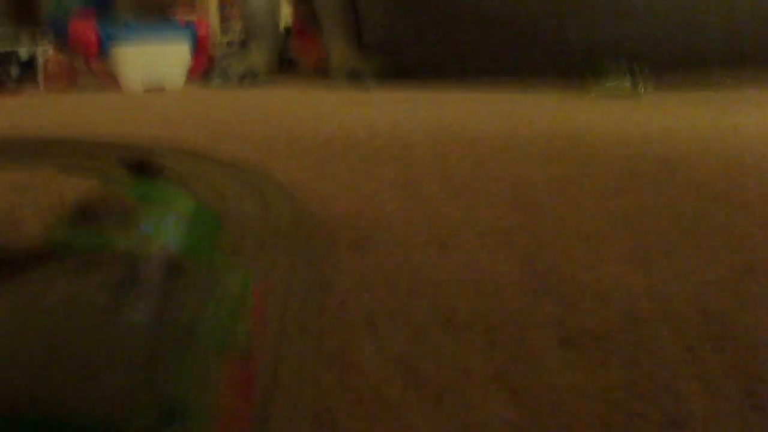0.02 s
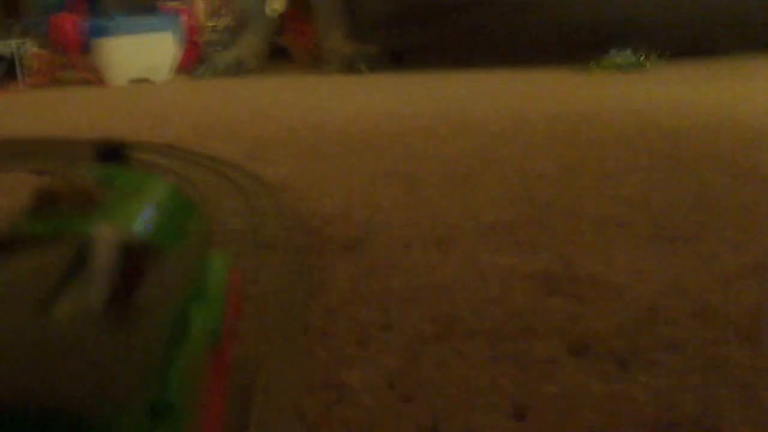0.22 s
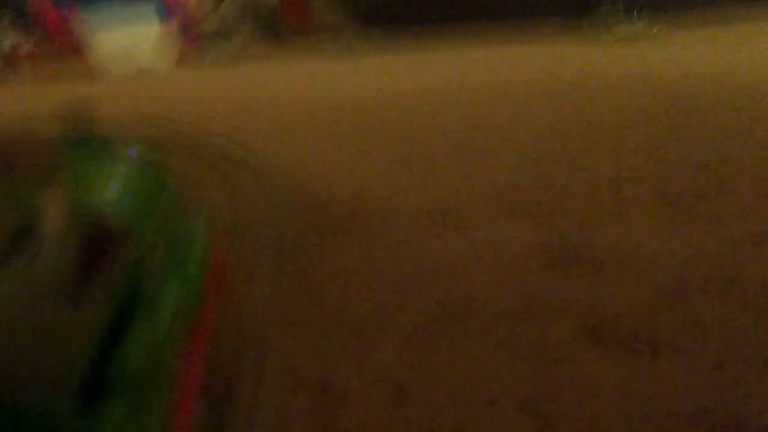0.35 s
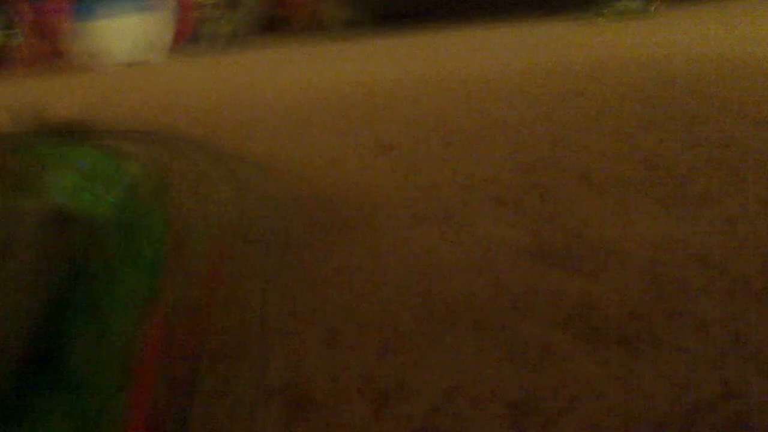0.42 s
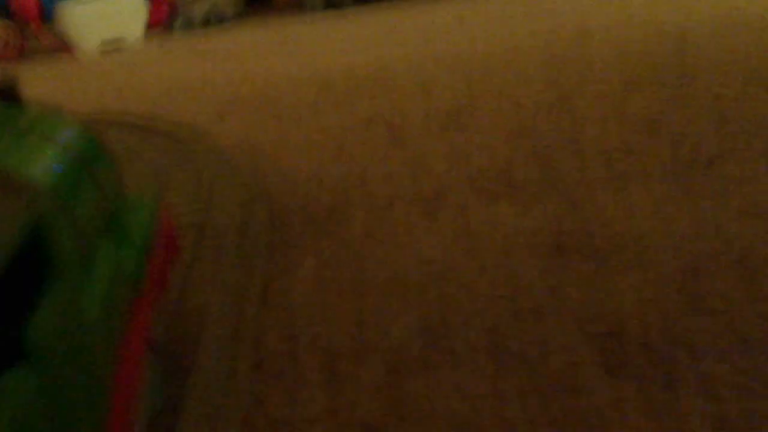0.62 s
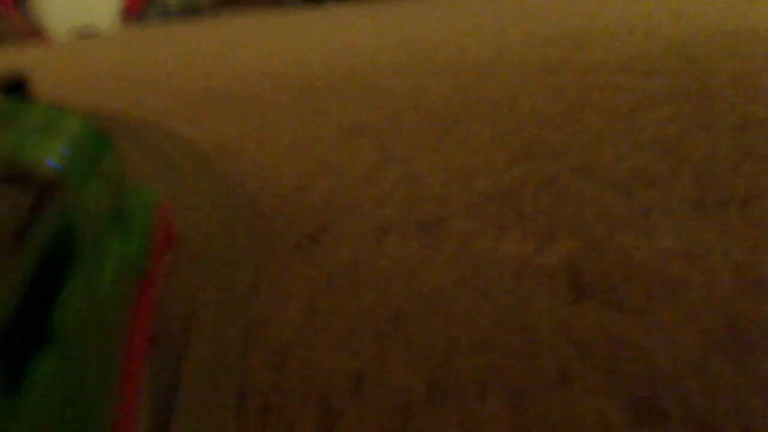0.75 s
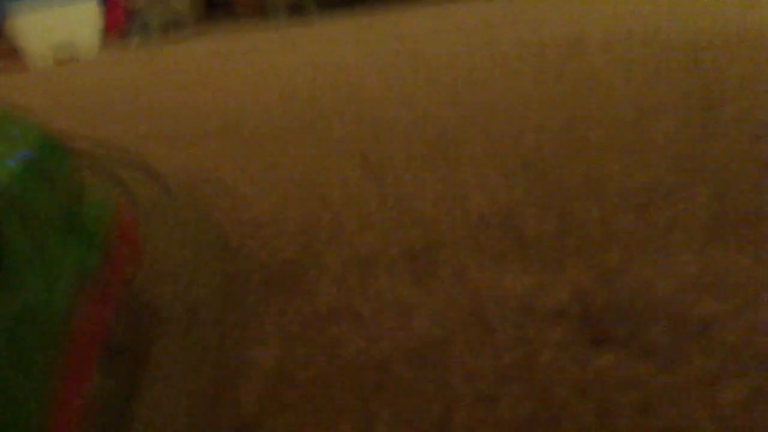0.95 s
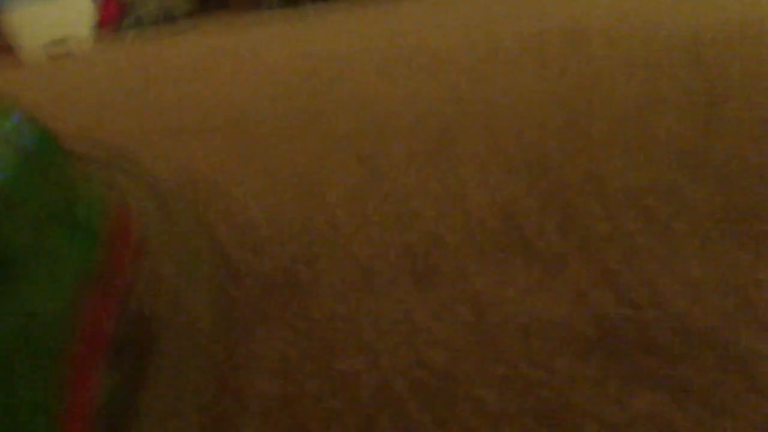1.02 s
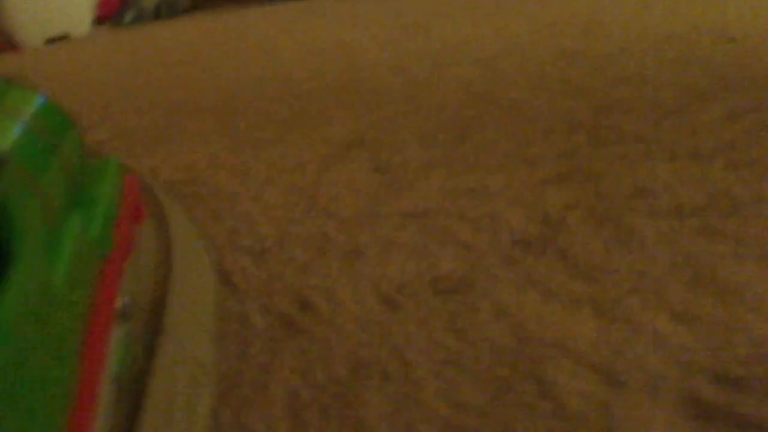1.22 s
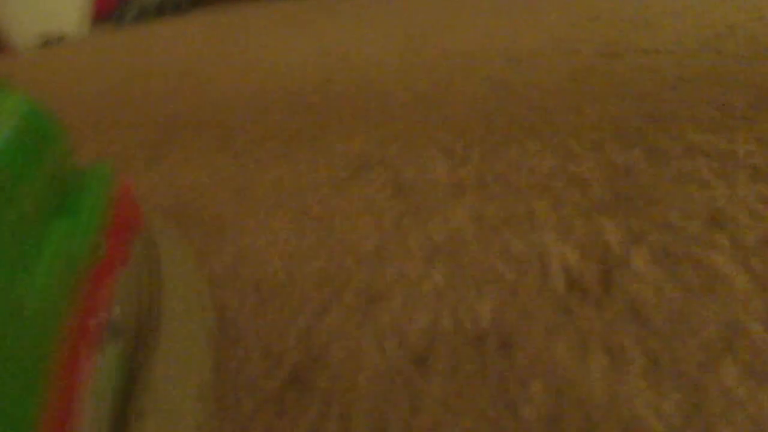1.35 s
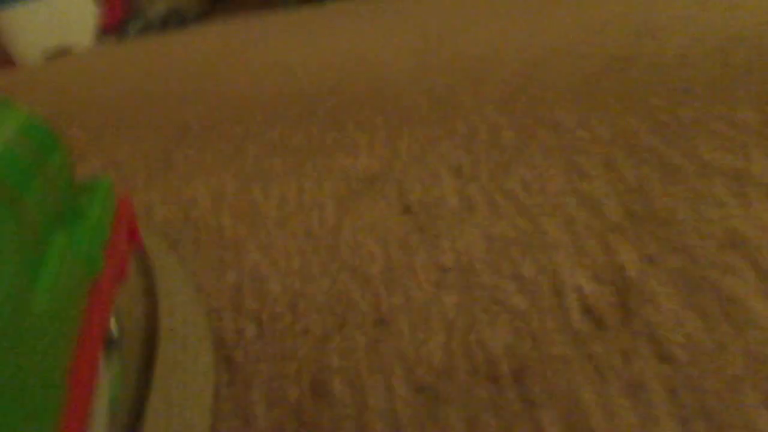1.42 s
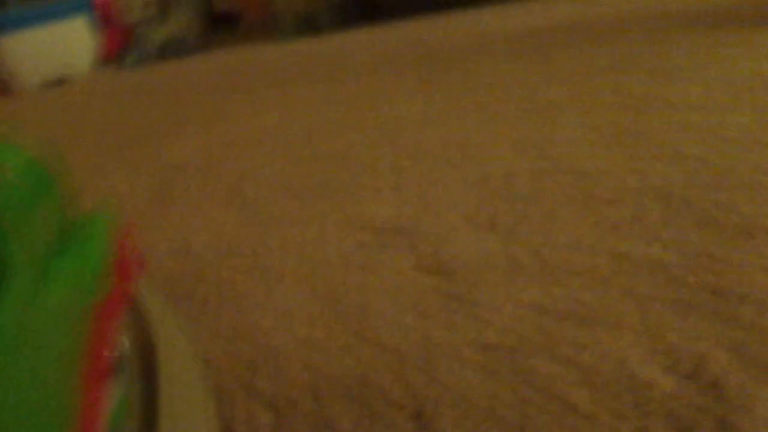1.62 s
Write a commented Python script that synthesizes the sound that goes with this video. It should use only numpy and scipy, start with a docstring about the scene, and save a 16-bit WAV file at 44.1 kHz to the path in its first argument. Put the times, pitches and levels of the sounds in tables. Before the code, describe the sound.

A battery toy train runs on plastic track over carpet, heard very close, its motor and gears whirring throughout. A sharp plastic snap comes right at the start, with faint axle squeaks. From about 0.1 seconds the wheels knock and rattle the hollow body quickly and unevenly, with dull thumps and small clicks. The strongest knock falls near 0.7 seconds between two brief axle groans. Rattling continues until about 1.7 seconds.

```python
"""Battery toy train on plastic track over carpet, microphone riding on it.
Motor and gears whir throughout; rubbing axles briefly squeak and groan.
A hard plastic snap comes near the start. Then the wheels knock and rattle the hollow body,
the track thumps on the carpet and loose parts click. A faint low drone lies underneath."""
import sys
import numpy as np
from scipy import signal
from scipy.fft import rfft, irfft, next_fast_len
from scipy.io import wavfile
from scipy.ndimage import map_coordinates

SR = 44100
rng = np.random.default_rng(int(sys.argv[2]) if len(sys.argv) > 2 else 0)


def master(y):
    """Save y as 16-bit WAV."""
    cut = np.clip(np.atleast_2d(y).T, -1, 1)
    pcm = np.round(cut * 32767)  # scale
    wavfile.write(sys.argv[1], SR, pcm.astype(np.int16))


N = 74970
T = np.arange(N) / SR
EVENT_T = T[:SR // 10]


def amp(db):
    return 10 ** (np.asarray(db) / 20)


def unit_rms(x):
    return x / np.sqrt(np.mean(x ** 2) + 1e-20)


def curve(rows):
    """One value per sample from (time_s, value) rows."""
    return np.interp(T, *np.transpose(rows))


def wobble(knots_per_s):
    """Smooth random curve."""
    return map_coordinates(rng.standard_normal(int(N * knots_per_s / SR) + 4), [T * knots_per_s])


def filtered(x, response):
    """FFT filter with gain response(hz)."""
    size = next_fast_len(len(x) + 8192)
    return irfft(rfft(x, size) * response(np.fft.rfftfreq(size, 1 / SR)), size)[:len(x)]


def coloured(x, colour):
    """x shaped by (freq_hz, gain_db) rows, at rms 1."""
    freq_hz, gain_db = np.transpose(colour)
    return unit_rms(filtered(x, lambda hz: amp(np.interp(np.log(hz + 1), np.log(freq_hz + 1), gain_db))))


def noise(colour, samples=N):
    return coloured(rng.standard_normal(samples), colour)


def resonance(hz, centre_hz, half_width_hz):
    return 1 / (1 + ((hz - centre_hz) / half_width_hz) ** 2)


def add(track, start_s, sound):
    part = track[max(round(start_s * SR), 0):][:len(sound)]
    part += sound[:len(part)]


def swell(rise_s):
    """Reaches 1 at rise_s, then decays."""
    return EVENT_T / rise_s * np.exp(1 - EVENT_T / rise_s)


def decay(t60_s):
    return np.exp(-np.log(1000) * EVENT_T / t60_s)


def ping(pitch_hz, rise_s, phase_cycles=0):
    """One damped mode."""
    return swell(rise_s) * np.sin(2 * np.pi * (pitch_hz * EVENT_T + phase_cycles))


def ring(modes, pitch_hz, scatter_db=2.5, detune=0.025):
    """One blow on damped modes, each scattered in level and pitch."""
    out = np.zeros(len(EVENT_T))
    for ratio, level_db, rise_s in modes:
        gain = amp(level_db + scatter_db * rng.standard_normal())
        mode_hz = pitch_hz * ratio * (1 + detune * rng.standard_normal())
        out += gain * ping(mode_hz, rise_s)
    return out


def bursts(rate_hz, jitter, scatter_db, t60_s):
    """Train of tiny noise bursts, uneven in size and spacing."""
    timing, size = rng.standard_normal((1024, 2)).T
    onsets = np.round((np.arange(len(timing)) + jitter * timing) / rate_hz * SR).astype(int)
    inside = (onsets >= 0) & (onsets < N)
    hits = np.bincount(onsets[inside], amp(scatter_db * np.clip(size[inside], -2, 2)), N)
    return signal.fftconvolve(hits, decay(t60_s))[:N] * rng.standard_normal(N)


def drone(level_db=-60):
    """Faint, steady low noise."""
    colour = [(25, -16), (80, 14), (250, -29), (400, 13), (550, -16.5), (900, 1), (1500, -43),
              (4000, -26.5)]  # drone spectrum: freq_hz, gain_db
    return amp(level_db) * noise(colour)


def motor(shaft_hz=117.5, pulse_depth=0.24, whir_db=-1.52, gear_db=-11.5, whine_db=-11.5):
    """Whir pulsing with the shaft, gear teeth ticking in uneven clumps, and a thin whine."""
    envelope = [(0, -43.5), (.1, -48.5), (.2, -47.5), (.35, -46.5), (.55, -45), (.75, -47), (.95, -47),
                (1.2, -45.5), (1.45, -47), (1.7, -45.5)]  # overall motor gain: time_s, gain_db
    whir_colour = [(600, -13), (1000, -4), (1180, -31), (1350, 1), (1600, -6), (1950, 3), (2450, 0.5),
                   (2640, 4.5), (2750, 1.5), (2890, 7), (3060, -0.5), (3230, 3.5), (3600, -2.5),
                   (4350, 0.5), (4720, -9), (5450, -1.5), (6100, -3.5), (6500, -10.5), (7000, -8.5),
                   (7800, -21.5), (9000, -14), (10800, -17.5), (11300, -15.5), (13000, -25), (15000, -37),
                   (16000, -45)]  # whir spectrum: freq_hz, gain_db
    gear_colour = [(1000, 6.5), (3000, -5.5), (4700, 2), (5600, -1.5), (7500, -1.5), (9000, 5),
                   (10100, 0.5), (10800, -11.5), (13500, -8), (15000, -24), (16000, -37)]  # tooth tick spectrum: freq_hz, gain_db
    turns = np.cumsum(shaft_hz * (1 + 0.027 * wobble(12))) / SR
    whir = noise(whir_colour) * (1 + pulse_depth * np.sin(2 * np.pi * turns))
    gears = coloured(bursts(rate_hz=440, jitter=0.25, scatter_db=3.5, t60_s=0.005), gear_colour)
    whine = filtered(rng.standard_normal(N), lambda hz: resonance(hz, centre_hz=3220, half_width_hz=63))
    whir *= amp(whir_db + 2.5 * wobble(90))
    gears *= amp(gear_db + 5 * wobble(140))
    return amp(curve(envelope)) * (whir + gears + amp(whine_db) * unit_rms(whine))


def axles(jitter=0.019, flutter_db=3.5, knots_per_s=260):
    """Rubbing axles: each stroke an unsteady gliding tone that swells and fades."""
    # high and low strokes: start_s, length_s, level_db, start_hz, end_hz
    squeaks = [(.002, 0.048, -43, 3250, 3150), (0.127, 0.053, -38.5, 3170, 3280),
               (.21, 0.047, -49, 3300, 3126)]
    groans = [(0, 0.015, -41, 395, 374), (0.617, 0.038, -34, 480, 331), (0.745, 0.051, -35, 329, 486)]
    out = np.zeros(N)
    for start_s, length_s, level_db, start_hz, end_hz in squeaks + groans:
        progress = np.clip((T - start_s) / length_s, 0, 1)
        pitch_hz = (start_hz + (end_hz - start_hz) * progress) * (1 + jitter * wobble(knots_per_s))
        envelope = amp(level_db + flutter_db * wobble(knots_per_s)) * np.sin(np.pi * progress)
        out += envelope * np.sin(2 * np.pi * np.cumsum(pitch_hz) / SR)
    return out


def rattle(gain_db=-2):
    """Loose parts rattling between the wheel knocks."""
    envelope = [(0, -39.5), (.06, -56), (.11, -89), (.14, -36.5), (.25, -40.5), (.28, -51), (.34, -37),
                (.42, -38.5), (.47, -38), (.56, -37.5), (.605, -50), (.66, -41.5), (.75, -40), (.82, -44),
                (.93, -39), (1.15, -41.5), (1.2, -50.5), (1.32, -37.5), (1.47, -57.5), (1.54, -39.5),
                (1.59, -56), (1.65, -41), (1.7, -51)]  # rattle strength: time_s, level_db
    colour = [(30, -35), (80, -19), (160, -5.5), (280, 3.5), (410, 3.5), (500, -1.5), (600, -0.5),
              (750, -4), (810, 9.5), (885, 5.5), (1060, -6.5), (1180, -11), (1370, -9), (2000, -19.5),
              (4000, -50)]  # rattle spectrum: freq_hz, gain_db
    impacts = bursts(rate_hz=320, jitter=1, scatter_db=5.5, t60_s=0.017)
    return amp(curve(envelope) + gain_db) * coloured(impacts, colour)


def hollow_body(hz):
    """Complex response of the hollow plastic body."""
    # resonances and the gaps between them: centre_hz, width_hz, gain_db
    peaks = [(412, 70, 2), (585, 50, 3), (757, 45, 4), (877, 35, 5), (1060, 60, 2)]
    dips = [(498, 162, -6), (828.5, 83, -19.5), (1165, 49, -51)]
    response = 1
    for centre_hz, width_hz, gain_db in peaks + dips:
        damping = 1j * hz * width_hz
        response *= 1 + (amp(gain_db) - 1) * damping / (centre_hz ** 2 - hz ** 2 + damping)
    return response


def snap(crack_db=-8, tail_db=-22):
    """Hard plastic snap: bright crack, short modes, faint duller tail."""
    hits = [(0.0534, 0.5, 0.87), (0.0692, -10.5, 0.28)]  # snap and rebound: start_s, level_db, stretch
    modes = [(2810, -45.5, 0.0081), (3930, -28, 0.001), (4360, -17.5, .0011), (5390, -15.5, 0.0015),
             (7470, -11.5, 0.0007), (8370, -6.5, 0.00092), (9630, -15, .0009), (10690, -8, .0007),
             (11150, -9, 0.00063)]  # plastic modes: pitch_hz, mode_db, rise_s
    crack_colour = [(150, -19), (1000, -16), (2300, -19), (2900, -18), (3800, 2.5), (6500, -3),
                    (9000, -2.5), (11000, 6), (12200, -1), (14200, 0), (15500, -16), (16500, -24)]  # crack spectrum: freq_hz, gain_db
    tail_colour = [(150, -32), (1000, -1.5), (2200, -19), (2900, -7), (4400, 8.5), (6000, 2), (7200, -12),
                   (8700, 4), (10000, 1), (11300, -5), (12500, -1), (15500, -9), (16500, -28)]  # tail spectrum: freq_hz, gain_db
    out = np.zeros(N)
    for start_s, level_db, stretch in hits:
        crack = amp(crack_db) * swell(rise_s=stretch * 0.0012) * noise(crack_colour, len(EVENT_T))
        tail = amp(tail_db) * decay(t60_s=0.061) * noise(tail_colour, len(EVENT_T))
        ringing = sum(amp(mode_db) * ping(pitch_hz, stretch * rise_s, rng.random())
                      for pitch_hz, mode_db, rise_s in modes)
        add(out, start_s, amp(level_db) * (crack + ringing + tail))
    return out


def wheel_knocks():
    """Each wheel knock rings shell and chassis."""
    knocks = [(.131, -32.5, 850, -35.5, 377), (.1455, -20, 908, -40, 510), (.1824, -27.5, 940, -41, 407),
              (0.2126, -42, 1040, -36, 395), (0.2257, -23.5, 944, -39, 457), (0.2461, -26, 975, -39.5, 444),
              (.2675, -29, 950, -59, 342), (0.3027, -24.5, 875, -41, 387), (0.3162, -27, 850, -34, 403),
              (.333, -26.5, 840, -41, 384), (.3419, -28.5, 830, -41, 380), (0.352, -31, 870, -27, 340),
              (.362, -17.5, 931, -34, 427), (.3795, -31, 806, -32, 474), (0.3893, -23, 940, -42, 307),
              (0.4242, -32, 736, -36, 420), (0.4533, -21, 940, -31.5, 380), (0.4579, -36, 946, -30.5, 385),
              (.462, -22.5, 1006, -51, 403), (0.4676, -26, 996, -32, 320), (0.487, -22.5, 953, -34.5, 312),
              (.517, -36, 980, -37.5, 370), (.535, -23, 954, -28.5, 365), (0.546, -24.5, 776, -31, 426),
              (0.5564, -28.5, 934, -47, 396), (.578, -26, 976, -38, 498), (0.582, -27.5, 950, -38, 462),
              (.627, -33.5, 1010, -30, 411), (0.6479, -26, 880, -37, 384), (.656, -24, 877, -38, 384),
              (.682, -12, 916, -31.5, 417), (.6893, -19, 862, -52, 466), (0.6994, -27, 880, -41, 526),
              (0.7206, -37, 680, -38, 570), (0.7496, -28, 913, -37.5, 318), (0.7844, -24.5, 940, -44, 430),
              (0.8002, -20, 903, -52, 514), (.809, -32.5, 786, -60, 557), (0.8376, -30.5, 870, -46, 280),
              (0.8775, -20.5, 857, -31, 337), (0.9124, -22, 890, -38, 415), (0.9249, -24, 863, -37, 371),
              (0.9344, -27.5, 915, -33, 374), (0.964, -27, 880, -33.5, 383), (0.9813, -32, 902, -43, 357),
              (1.027, -32.5, 814, -28, 394), (1.092, -34.5, 870, -30.5, 335),
              (1.1135, -22, 910, -32.5, 376), (1.1226, -28, 810, -54, 365), (1.1352, -34, 890, -32.5, 450),
              (1.1517, -24.5, 787, -40, 441), (1.161, -43, 830, -41, 402), (1.232, -33.5, 930, -38.5, 400),
              (1.2602, -23.5, 790, -36.5, 588), (1.292, -54, 940, -27, 343), (1.3142, -39, 900, -26.5, 384),
              (1.319, -30.5, 900, -50, 435), (1.326, -29, 884, -36.5, 417), (1.338, -33, 902, -36.5, 490),
              (1.398, -35, 670, -33.5, 404), (1.411, -44, 870, -40, 350), (1.521, -22.5, 965, -39, 460),
              (1.529, -34, 1000, -38, 429), (1.552, -34.5, 957, -54, 358), (1.612, -35.5, 970, -33.5, 271),
              (1.653, -34, 783, -44, 343)]  # wheel blows: start_s, shell_db, shell_hz, chassis_db, chassis_hz
    # struck modes: pitch_ratio, level_db, rise_s
    shell_modes = [(1, -2, 0.0015), (1.14, -21.5, 0.0065)]
    chassis_modes = [(1.049, 0.5, 0.0034), (1.52, -13, 0.0049), (0.714, -13.5, 0.0063)]
    out = np.zeros(N)
    for start_s, shell_db, shell_hz, chassis_db, chassis_hz in knocks:
        shell = amp(shell_db) * ring(shell_modes, shell_hz)
        chassis = amp(chassis_db) * ring(chassis_modes, chassis_hz)
        add(out, start_s, rng.choice([-1, 1]) * (shell + chassis))
    return out


def track_bumps():
    """Track thumping dully on the carpet."""
    bumps = [(0.1435, -44, 170, .002), (0.1817, -39, 197, 0.0021), (.2122, -38, 160, 0.0025),
             (.276, -41.5, 155, 0.0057), (0.3031, -27.5, 185, 0.0019), (0.3619, -28.5, 188, 0.0031),
             (0.379, -36.5, 130, 0.0022), (0.3891, -32, 234, 0.0013), (.538, -31.5, 266, 0.0033),
             (0.554, -40, 170, 0.0013), (.58, -35, 200, 0.0015), (0.6987, -36.5, 188, 0.0014),
             (0.7213, -35.5, 146, .0025), (.7492, -39, 128, 0.0029), (0.9807, -36.5, 240, 0.0013),
             (1.029, -28, 191, 0.0012), (1.091, -32, 173, 0.0024), (1.114, -48, 190, 0.0026),
             (1.159, -42, 130, 0.0012), (1.335, -35, 206, 0.001), (1.413, -32.5, 247, 0.0026),
             (1.551, -34.5, 217, 0.005), (1.654, -42, 170, 0.0023)]  # thumps: start_s, level_db, pitch_hz, rise_s
    out = np.zeros(N)
    for start_s, level_db, pitch_hz, rise_s in bumps:
        add(out, start_s, amp(level_db) * ping(pitch_hz, rise_s))
    return out


def clicks(scrape_db=-3, skirt_db=-31, half_width_ratio=0.23):
    """Loose plastic parts click and scrape: a short ring inside a broad noise band."""
    contacts = [(.1818, -35.5, 5270, 0.00058, -8), (0.1965, -21.5, 1840, 0.0008, -10),
                (0.196, -34.5, 4880, 0.0033, -15), (.203, -31, 2150, 0.0014, -3),
                (.2128, -30.5, 1590, 0.0025, 1), (.246, -38, 1890, 0.0021, -8),
                (.258, -36.5, 1910, 0.0035, 5.5), (0.304, -38, 5100, 0.00095, -9),
                (0.3612, -35.5, 1920, 0.0041, -4), (0.3794, -37, 7620, 0.0013, 1.5),
                (0.388, -38, 7400, 0.0026, -3), (.457, -37, 2050, 0.0078, -1),
                (0.4577, -32, 7230, 0.005, -11), (0.6887, -40.5, 6200, 0.004, -6),
                (0.7485, -39, 7000, 0.00079, -17), (.753, -49.5, 14000, 0.0064, -12),
                (.874, -40, 5950, 0.0031, -1), (0.9836, -40.5, 5150, 0.0023, -11),
                (1.0292, -26, 5370, 0.0011, 5), (1.028, -37.5, 1500, 0.0014, 1),
                (1.036, -41, 5600, 0.0042, 1), (1.047, -39, 5400, 0.0016, 1),
                (1.133, -37.5, 5020, 0.00079, 0), (1.15, -37.5, 4300, 0.0018, -14),
                (1.2507, -33.5, 5350, 0.0013, 6), (1.2578, -35, 4700, 0.0031, -13),
                (1.3135, -37, 5800, 0.00067, -7), (1.321, -42.5, 6030, .003, 4),
                (1.338, -40, 5000, 0.0023, -7), (1.397, -39, 5620, 0.00061, 1.5),
                (1.41, -37.5, 5740, 0.0027, -6), (1.648, -38.5, 1290, 0.0039, 3.5)]  # part contacts: start_s, level_db, centre_hz, rise_s, ring_db
    out = np.zeros(N)
    for start_s, level_db, centre_hz, rise_s, ring_db in contacts:
        def band(hz):
            skirt = amp(skirt_db) * resonance(hz, 0, 2 * centre_hz)
            return resonance(hz, centre_hz, half_width_ratio * centre_hz) + skirt
        hiss = unit_rms(filtered(rng.standard_normal(len(EVENT_T)), band))
        scrape = amp(scrape_db) * swell(rise_s) * hiss
        tick = amp(ring_db) * ping(centre_hz, rise_s=0.00086)
        add(out, start_s, amp(level_db) * (scrape + tick))
    return out


def scene(impact_db=-0.5):
    """Mono mix; knocks, bumps and rattle pass through the hollow body."""
    mix = drone() + snap()
    impacts = amp(impact_db) * (wheel_knocks() + track_bumps())
    mix += filtered(impacts + rattle(), hollow_body)
    return (mix + clicks() + axles() + motor())[None]


def record(dry, low_cut_hz=100, ceiling=1.17, top_hz=15900):
    """Bass cut, soft clip, band limit."""
    thinned = signal.sosfilt(signal.butter(2, low_cut_hz, "high", fs=SR, output="sos"), dry[0])
    rounded = thinned / (1 + (thinned / ceiling) ** 4) ** (1 / 4)
    return signal.sosfilt(signal.butter(24, top_hz, fs=SR, output="sos"), rounded)[None]


dry = scene()
out = record(dry)
master(out)
```